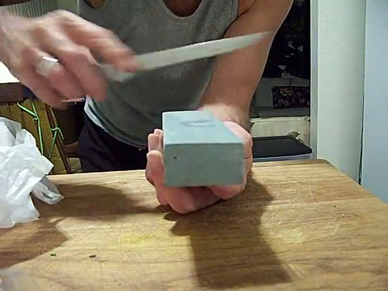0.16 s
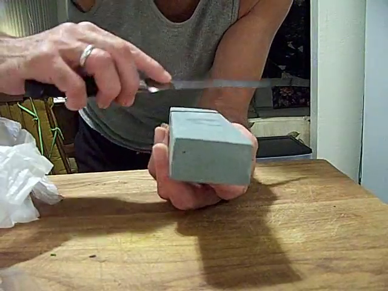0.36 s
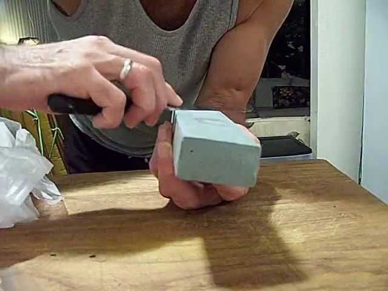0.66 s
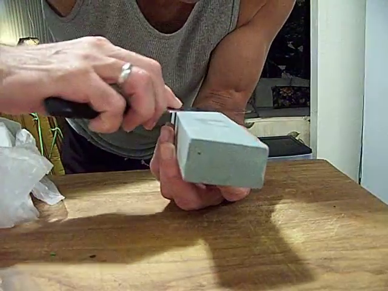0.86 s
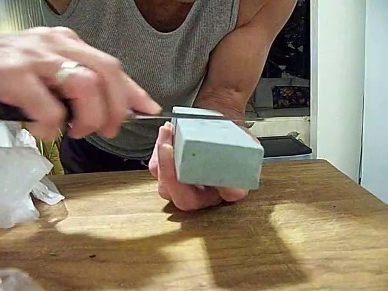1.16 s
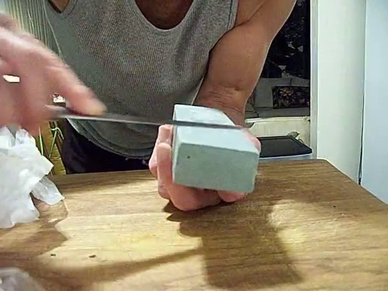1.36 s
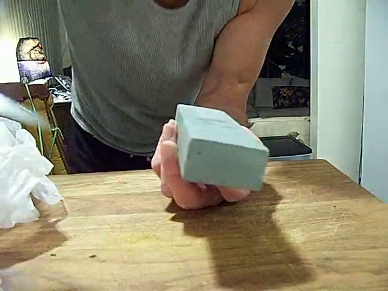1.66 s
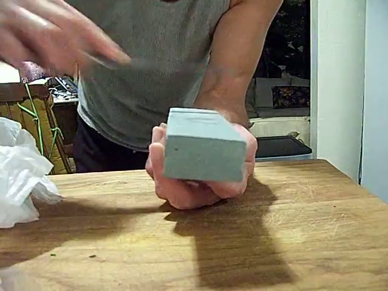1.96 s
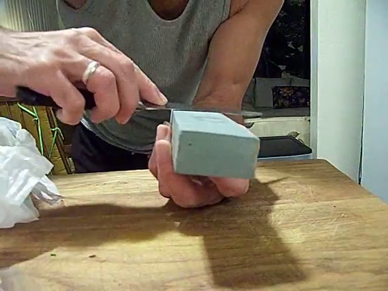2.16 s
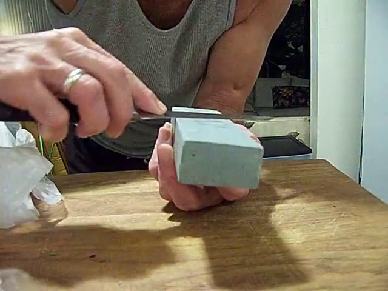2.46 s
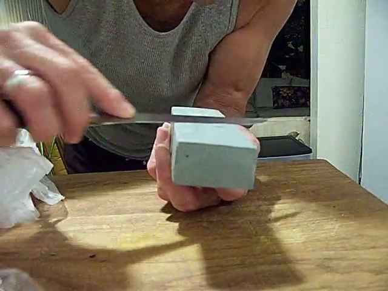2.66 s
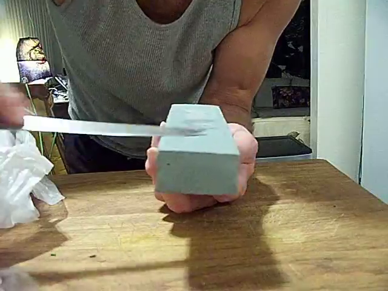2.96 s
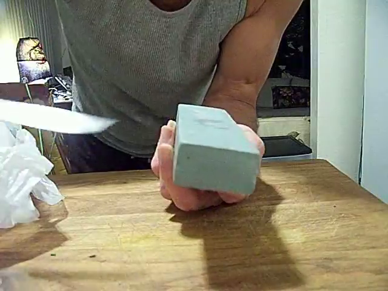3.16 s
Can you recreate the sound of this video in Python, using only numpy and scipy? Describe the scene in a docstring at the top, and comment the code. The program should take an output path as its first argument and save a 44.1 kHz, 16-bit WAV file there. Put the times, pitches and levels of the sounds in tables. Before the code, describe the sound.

Close up in a small indoor room, a steel blade clicks on a sharpening stone and makes two gritty, high hissing draws with a wavering thin ring, separated by half a second of quiet hum and hiss.

```python
"""Knife on a whetstone

A kitchen knife lands on a hand-held whetstone and is drawn across it twice. Random grit excites a broad
scrape, the stone's own ring and the blade's bending modes, which glide as the contact moves along the edge.
Knocks add short decaying modes with a bright rasp. A noise tail gives the small room; hum lines and
shaped hiss lie beneath, with one low pop at the microphone. A low sampling rate mirrors the treble."""
import sys
import numpy as np
from scipy import signal
from scipy.fft import rfft, irfft, next_fast_len
from scipy.io import wavfile
from scipy.ndimage import map_coordinates

SR = 44100
rng = np.random.default_rng(int(sys.argv[2]) if len(sys.argv) > 2 else 0)


def convert_level_to_amplitude(level_db):
    """Map a level in decibels to its linear amplitude factor."""
    exponent = np.asarray(level_db, float) / 20
    return 10 ** exponent


def to_wav(s):
    """Save 16-bit WAV."""
    ch = np.atleast_2d(s).T  # columns
    pcm = np.round(np.clip(ch, -1, 1) * 32767)  # PCM
    wavfile.write(sys.argv[1], SR, pcm.astype(np.int16))


N = 145530
T = np.arange(N) / SR


def unit(x):
    """Scale to rms 1."""
    return x / np.sqrt(np.mean(x ** 2) + 1e-20)


def along(points, hz):
    """Read a (f/Hz, value) curve on a log frequency axis."""
    f, value = np.transpose(points)
    return np.interp(np.log(hz + 1), np.log(f + 1), value)


def curves(rows):
    """One breakpoint envelope per column after the time."""
    s, *columns = np.transpose(rows)
    return [np.interp(T, s, column) for column in columns]


def fade(rows, edge_s):
    """Gate: 1 between the first and last row time, with short ramps inside."""
    return np.clip(np.minimum(T - rows[0][0], rows[-1][0] - T) / edge_s, 0, 1)


def wobble(rate):
    """A smooth random curve through rate knots a second."""
    knots = rng.standard_normal(int(N * rate / SR) + 4)
    return map_coordinates(knots, [T * rate])


def coloured(x, spectrum):
    """EQ x by a (f/Hz, level/dB) curve, then scale to rms 1."""
    m = next_fast_len(N + 8192)
    gain = convert_level_to_amplitude(along(spectrum, np.fft.rfftfreq(m, 1 / SR)))
    return unit(irfft(rfft(x, m) * gain, m)[:N])


def ring(x, hz, width_hz):
    """x twice through one resonance whose pitch may move, rms 1."""
    turn = np.exp(2j * np.pi * np.cumsum(hz * np.ones(len(x))) / SR)
    pole = np.exp(-np.pi * abs(width_hz) / SR)
    # shift the pitch down to 0 Hz, smooth there, shift back up
    smoothed = signal.lfilter([1], [1, -2 * pole, pole ** 2], x / turn)
    return unit((smoothed * turn).real)


def grit():
    """Tiny slips of uneven size over fine noise."""
    slips_per_s, spread_db, slip_share = 6000, 3, 0.48  # slip_share is of the power
    size = convert_level_to_amplitude(spread_db * np.minimum(rng.exponential(size=N), 4))
    slips = (rng.random(N) < slips_per_s / SR) * rng.standard_normal(N) * size
    return np.sqrt(slip_share) * unit(slips) + np.sqrt(1 - slip_share) * rng.standard_normal(N)


# The two draws across the stone, one list each:
# (t/s, scrape level/dB, stone ring level/dB, lower scrape level/dB), before the shimmer
STROKE_LEVELS = [
    [(0.73, -54.5, -65, -78), (0.8, -44.5, -63, -64), (0.816, -53, -63, -72), (0.84, -62, -48.5, -56),
     (0.906, -29, -38.5, -49), (0.928, -37, -58.5, -48.5), (0.968, -40, -45, -47), (1.014, -30, -49.5, -50),
     (1.088, -30, -51.5, -54), (1.148, -22, -38.5, -42.5), (1.18, -31, -56, -57),
     (1.246, -25.5, -46.5, -48.5), (1.27, -27.5, -78, -54.5), (1.292, -43.5, -63, -49),
     (1.304, -22, -49, -48.5), (1.372, -34.5, -62, -51), (1.388, -31, -52, -51), (1.412, -35, -60, -48),
     (1.444, -31, -50.5, -47.5), (1.478, -29.5, -40.5, -46), (1.494, -38, -38, -57),
     (1.514, -34.5, -41.5, -43.5), (1.524, -34.5, -59, -52), (1.534, -32.5, -58.5, -45),
     (1.6, -49.5, -88, -74)],
    [(2.1, -34.5, -54, -64), (2.104, -39, -53, -46.5), (2.164, -24.5, -51, -51), (2.204, -41.5, -56, -52.5),
     (2.268, -34.5, -52.5, -53.5), (2.28, -31, -60, -48), (2.336, -29.5, -43, -52.5),
     (2.378, -28, -55.5, -49.5), (2.424, -29, -48.5, -50), (2.466, -29, -54, -53), (2.566, -22, -49.5, -47),
     (2.632, -33.5, -46, -54), (2.654, -26.5, -70, -47), (2.682, -30.5, -47.5, -48),
     (2.74, -35.5, -75, -53.5), (2.77, -31, -64, -54), (2.79, -37.5, -71, -46), (2.824, -31.5, -58, -52.5),
     (2.86, -39, -44, -50), (2.916, -28, -43.5, -49), (2.976, -28, -46.5, -44.5), (3.004, -34, -21, -38),
     (3.022, -24.5, -39.5, -42.5), (3.054, -38.5, -71.5, -59.5), (3.1, -49, -69, -59)],
]
# The stone's own resonances: (f/Hz, relative level/dB, width of each filter pass/Hz)
STONE_MODES = [(2625, 0, 100), (2510, -13, 120), (2850, -17, 200)]
# Spectrum of the bright scrape: (f/Hz, relative level/dB)
SCRAPE_SPECTRUM = [(4500, -120), (5000, -43.5), (5600, -14), (7000, 9), (7450, 10), (8000, 5.5), (9600, 2)]
# Spectrum of the lower scrape: (f/Hz, relative level/dB)
LOWER_SPECTRUM = [(300, -120), (500, -17), (1200, -11), (1700, -14.5), (2300, -3), (3500, -5), (4050, -15),
                  (4250, -13), (4450, -6), (4900, 3), (5500, 2), (6200, 2.5), (6800, -120)]


def strokes(rub):
    """The edge scrapes the stone: the same grit drives two scrape bands and the stone's ring."""
    shimmer_db = 1.5
    stone = unit(sum(convert_level_to_amplitude(db) * ring(rub, hz, width) for hz, db, width in STONE_MODES))
    layers = [coloured(rub, SCRAPE_SPECTRUM), stone, coloured(rub, LOWER_SPECTRUM)]
    out = np.zeros(N)
    for rows in STROKE_LEVELS:
        levels = [convert_level_to_amplitude(db + shimmer_db * wobble(40)) for db in curves(rows)]
        out += fade(rows, 0.0025) * sum(level * layer for level, layer in zip(levels, layers))
    return out


# The blade's bending modes, one list for each while it sounds:
# (t/s, f/Hz before jitter, level/dB)
BLADE_GLIDES = [
    [(.8, 1134, -71), (1.05, 1127, -71.5), (1.17, 1425, -68.5), (1.27, 1505, -72.5), (1.46, 1170, -69.5)],
    [(.94, 410, -49), (1.01, 427, -64)],
    [(.98, 1910, -62.5), (1.08, 1990, -57)],
    [(1.28, 1232, -73), (1.39, 1193, -56.5)],
    [(1.42, 680, -67.5), (1.56, 1073, -64)],
    [(.92, 2850, -57), (1.1, 3240, -63), (1.31, 3050, -72), (1.35, 3340, -57)],
    [(1.07, 3320, -56), (1.17, 3700, -57.5), (1.2, 3810, -74), (1.23, 3520, -53)],
    [(1.38, 3520, -62), (1.45, 3400, -66)],
    [(1.47, 2540, -47), (1.51, 3270, -53), (1.59, 2690, -65)],
    [(.75, 4700, -73), (.9, 4620, -63.5), (1.13, 4720, -61.5)],
    [(.93, 5000, -56), (1.02, 5000, -62)],
    [(1.07, 5800, -58), (1.14, 6330, -39.5), (1.18, 6730, -42)],
    [(1.2, 5350, -55), (1.26, 5100, -67), (1.37, 5380, -45)],
    [(1.27, 5730, -54), (1.4, 6260, -39.5)],
    [(.76, 7180, -68.5), (.9, 6700, -35.5), (.93, 6890, -37), (.97, 7050, -35.5), (1.02, 6700, -40)],
    [(1.28, 6350, -45), (1.34, 7460, -43), (1.39, 6680, -29)],
    [(1.38, 7450, -32.5), (1.45, 6620, -34)],
    [(.73, 7610, -75.5), (.93, 7480, -55)],
    [(1.09, 7560, -36), (1.16, 7470, -30.5)],
    [(1.455, 7540, -23), (1.49, 7700, -47)],
    [(1.51, 6700, -29), (1.54, 7460, -46.5), (1.62, 7360, -61)],
    [(2.1, 784, -70.5), (2.3, 890, -62.5), (2.53, 880, -67.5)],
    [(2.25, 1130, -71.5), (2.55, 1310, -65)],
    [(2.6, 1610, -70), (2.74, 1290, -72), (2.86, 1170, -60)],
    [(2.28, 1876, -63.5), (2.36, 1990, -69.5), (2.42, 2100, -64), (2.54, 2340, -63.5)],
    [(2.3, 3080, -65.5), (2.46, 3300, -55.5), (2.58, 3620, -69)],
    [(2.63, 3800, -65), (2.72, 4020, -59)],
    [(2.84, 3830, -64), (2.87, 3600, -63), (2.92, 3060, -53), (2.96, 3330, -50)],
    [(2.1, 5350, -65.5), (2.3, 5320, -61.5), (2.52, 6090, -49), (2.58, 6760, -48), (2.61, 7270, -27)],
    [(2.33, 4940, -62), (2.55, 4740, -67), (2.65, 6200, -58), (2.76, 6330, -51), (2.83, 6300, -50)],
    [(2.63, 4230, -54.5), (2.66, 5140, -57), (2.72, 4890, -55)],
    [(2.84, 4620, -49.5), (2.9, 5040, -65), (2.97, 4560, -53), (3.04, 4690, -47)],
    [(2.1, 7030, -43.5), (2.17, 6900, -38), (2.28, 6960, -47.5)],
    [(2.14, 7680, -36.5), (2.22, 7550, -49.5), (2.27, 7660, -33)],
    [(2.29, 7430, -39.5), (2.45, 7410, -35)],
    [(2.2, 6250, -63), (2.4, 6740, -55)],
    [(2.666, 6940, -25), (2.69, 7330, -25), (2.712, 7980, -26)],
    [(2.92, 6740, -35.5), (3.03, 6804, -37.5)],
]


def blade_modes(rub):
    """The grit excites narrow blade modes that glide as the contact moves along the edge."""
    width_share, pitch_jitter = 0.045, 0.008  # shares of the pitch
    level_wobble_db, edge_s = 3, 0.005
    out = np.zeros(N)
    for rows in BLADE_GLIDES:
        edge = fade(rows, edge_s)
        on = edge > 0
        hz, db = (curve[on] for curve in curves(rows))
        flutter = unit(convert_level_to_amplitude(level_wobble_db * wobble(30.16)[on]))
        pitch = hz * (1 + pitch_jitter * wobble(40)[on])
        mode = ring(rub[on], pitch, width_share * hz.mean())
        out[on] += edge[on] * convert_level_to_amplitude(db) * flutter * mode
    return out


# The blade knocks the stone: (t/s, level/dB of the whole knock)
KNOCK_TIMES = [(0.6783, -21), (0.7547, -37.5), (0.7741, -35), (0.7996, -36), (0.83, -34.5), (0.8989, -28.5),
               (1.5387, -34), (2.1045, -21.5), (3.0279, -25.5)]
# Modes of one knock: (f/Hz, relative level/dB before scatter, t60/s)
KNOCK_MODES = [(1030, -18, 0.042), (1854, -16.5, 0.049), (2560, -35, .04), (2604, -3.5, 0.081),
               (3140, -19.5, 0.047), (3370, -34, 0.017), (5350, -17, .03), (6100, -2.5, 0.027)]


def touches():
    """The blade knocks or skips on the stone: short decaying modes and a bright rasp."""
    ring_db, scatter_db = -9, 2.5
    crack_db, crack_t60_s = -12.5, 0.059
    out, t = np.zeros(N + SR), T[:SR // 5]
    rasp = coloured(rng.standard_normal(N), SCRAPE_SPECTRUM)
    rasp = rasp + 0.16 * coloured(rng.standard_normal(N), LOWER_SPECTRUM)
    onset = 1 - np.exp(-t / 0.0005)
    for s, db in KNOCK_TIMES:
        start = round(s * SR)
        tone = np.zeros(len(t))
        for hz, level, t60 in KNOCK_MODES:
            decay = convert_level_to_amplitude(level + rng.normal(0, scatter_db) - 60 * t / t60)
            tone += decay * np.sin(2 * np.pi * hz * t)
        crack = convert_level_to_amplitude(crack_db - 60 * t / crack_t60_s) * rasp[start:][:len(t)]
        out[start:][:len(t)] += convert_level_to_amplitude(db) * (convert_level_to_amplitude(ring_db) * tone * onset + crack)
    return out[:N]


def pop():
    """One low push on the microphone and a slow rebound of opposite sign."""
    start_s, scale_db = 1.2423, -19
    rise_s, fall_s, rebound_s = 0.0001, 0.0091, 0.016  # time constants
    t = np.maximum(T - start_s, 0)
    rebound = fall_s / rebound_s * np.exp(-t / rebound_s)
    return convert_level_to_amplitude(scale_db) * (1 - np.exp(-t / rise_s)) * (np.exp(-t / fall_s) - rebound)


# Decay of the small room: (f/Hz, t60/s)
ROOM_DECAY = [(300, 0.9), (2600, .3), (8000, 0.39)]


def room(x):
    """Reverb from a noise tail in which each frequency dies at its own speed."""
    hz, t, z = signal.stft(rng.standard_normal(SR // 2), SR, nperseg=256)
    decay = convert_level_to_amplitude(-60 * t / along(ROOM_DECAY, hz)[:, None])
    tail = signal.istft(z * decay, SR, nperseg=256)[1]
    delayed = np.pad(x, (200, 0))  # pre-delay in samples
    return signal.fftconvolve(delayed, tail / np.linalg.norm(tail))[:N]


# Hum lines: (f/Hz, level/dB before a shared lift, wobble rate/knots per s)
HUM_LINES = [(53.8, -54.5, 4), (117.5, -63.5, 5), (202.4, -56, 2.12), (239.7, -58.5, 2.4)]


def hum():
    """Sine lines, slightly unsteady in level and phase."""
    lift_db, level_wobble_db, phase_wobble_rad = 2, 1.2, 0.9
    out = np.zeros(N)
    for hz, db, rate in HUM_LINES:
        level = convert_level_to_amplitude(db + lift_db + level_wobble_db * wobble(rate))
        phase = phase_wobble_rad * wobble(rate) + 2 * np.pi * rng.random()
        out += level * np.sin(2 * np.pi * hz * T + phase)
    return out


# Spectrum of room air and hiss: (f/Hz, relative level/dB)
AIR_SPECTRUM = [(12, -16), (25, -5), (60, -1), (90, -18.5), (160, -13.5), (300, -14), (420, -14),
                (560, -23), (1100, -26), (1900, -30), (2900, -31.5), (4100, -47), (5000, -38), (6500, -27),
                (7900, -21.5), (9600, -25)]


def air():
    """Room air and hiss: shaped noise whose level drifts a little."""
    level_db, drift_db = -50.5, 0.8
    level = convert_level_to_amplitude(level_db + drift_db * wobble(5.11))
    return level * coloured(rng.standard_normal(N), AIR_SPECTRUM)


def scene():
    """Knife, direct and through the room, over the pop, hum and air."""
    room_db = -6.5
    rub = grit()
    knife = strokes(rub) + blade_modes(rub) + touches()
    return (knife + convert_level_to_amplitude(room_db) * room(knife) + pop() + hum() + air())[None]


# What is kept of the mirrored treble: (f/Hz, level/dB)
MIRROR_LEVELS = [(8000, -0.5), (8300, -8), (8800, -26), (9260, -58), (9600, -120)]


def mirror_treble(x):
    """A low sampling rate: treble under half that rate returns, fading, as a mirror above it."""
    low_rate_hz = 16000
    m = next_fast_len(N + 8192)
    hz = np.fft.rfftfreq(m, 1 / SR)
    kept = irfft(rfft(x, m) * (hz < low_rate_hz / 2), m)
    # multiplying by a cosine at the sampling rate folds the spectrum over
    image = rfft(2 * kept * np.cos(2 * np.pi * low_rate_hz * np.arange(m) / SR))
    upper = (hz >= low_rate_hz / 2) * convert_level_to_amplitude(along(MIRROR_LEVELS, hz))
    return (kept + irfft(image * upper, m))[:, :N]


def low_pass(x):
    """Removes everything above the highest recorded frequency."""
    return signal.sosfilt(signal.butter(12, 9410, fs=SR, output="sos"), x)


def record(dry):
    """The scene taken at a low sampling rate, with its mirrored treble."""
    mix = mirror_treble(dry)
    return low_pass(mix)


dry = scene()
out = record(dry)
to_wav(out)
```